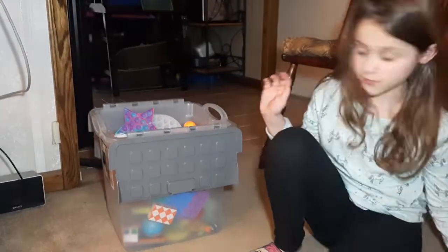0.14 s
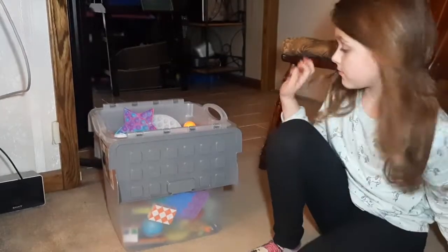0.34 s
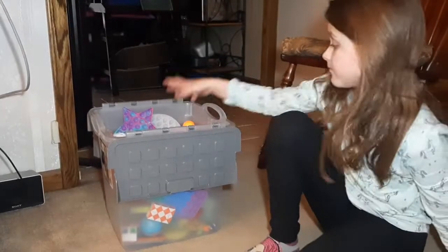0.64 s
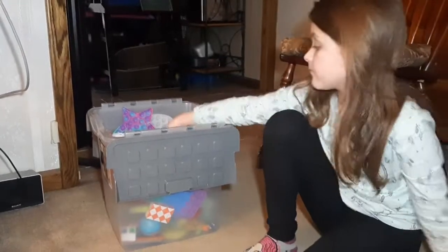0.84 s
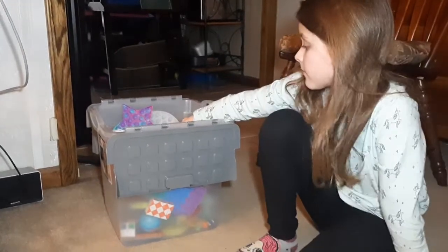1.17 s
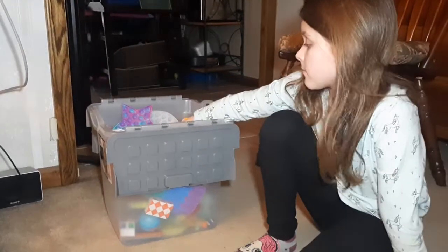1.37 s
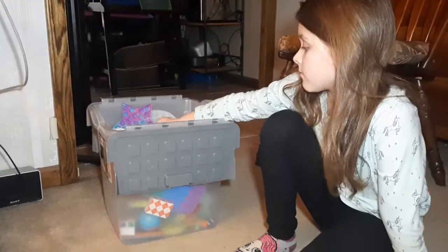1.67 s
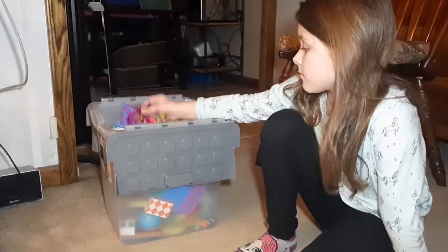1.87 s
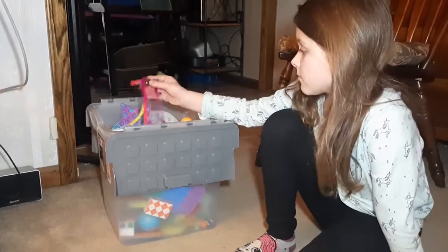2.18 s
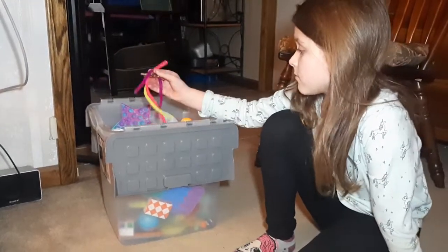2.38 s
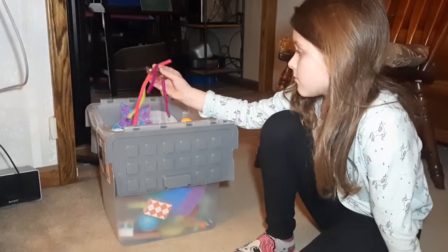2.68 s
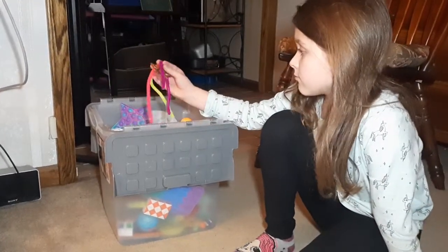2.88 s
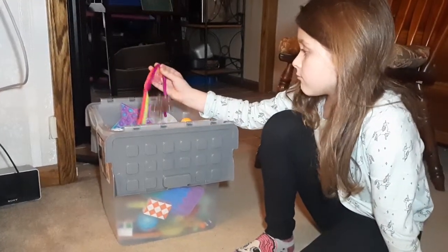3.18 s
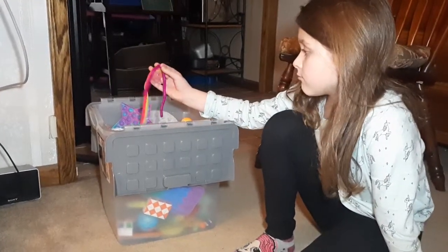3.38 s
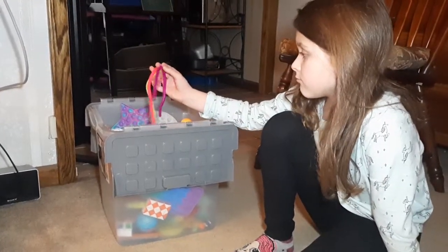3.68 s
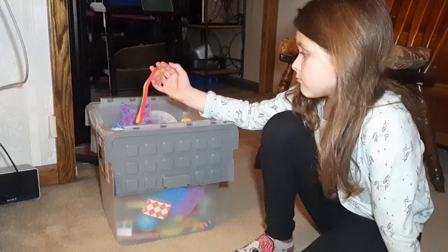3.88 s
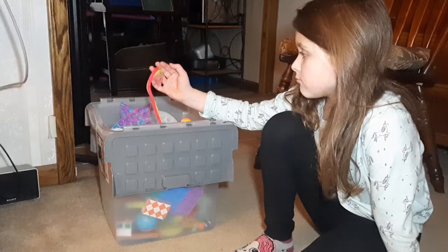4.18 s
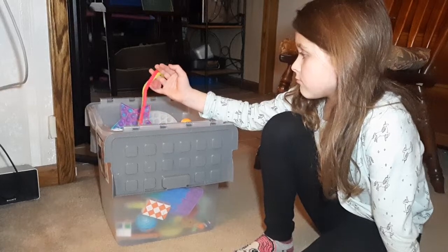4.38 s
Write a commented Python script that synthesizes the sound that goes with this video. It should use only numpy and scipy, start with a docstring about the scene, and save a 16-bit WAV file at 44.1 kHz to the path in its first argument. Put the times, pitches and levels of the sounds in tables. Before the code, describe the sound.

A hand rummages through small plastic toys in a bin, clicking, knocking and rattling, then a bright burst of hard clicks in a quiet room.

```python
"""A hand rummages in a plastic bin of small toys in a quiet carpeted room, a metre from a nearly mono microphone.
A sharp click and knock open over hum, rumble, a thin tone, ventilation and hiss; cloth slides from 0.47 to 1.1 s.
Clicks, knocks and booms (chatter ringing damped modes) crowd 0.75-2.5 s, with rattle and scrape from random grains.
After a lull a burst of hard clicks comes at 3.3-3.5 s, the loudest since the opening click, then contacts thin out;
a short room tail follows every contact."""
import sys
import numpy as np
from scipy import signal
from scipy.fft import rfft, irfft
from scipy.io import wavfile
from scipy.ndimage import uniform_filter1d

SR = 44100
rng = np.random.default_rng(int(sys.argv[2]) if len(sys.argv) > 2 else 0)


def magnitude_from_level(level_db):
    """Linear magnitude for a level in decibels (20 dB per decade)."""
    exponent = np.asarray(level_db, float) / 20
    return 10 ** exponent


def unload_audio(sound):
    """Save the sound as a 16-bit wav file, at the path given as the first command line argument."""
    columns = np.transpose(np.atleast_2d(sound))
    # keep every value between -1 and 1, then stretch to whole-number steps
    steps = np.round(np.clip(columns, -1, 1) * 32767)
    wavfile.write(sys.argv[1], SR, steps.astype(np.int16))


N = 199806


def level(x, db):
    """Scale to an rms level."""
    return x * magnitude_from_level(db) / np.sqrt(np.mean(x ** 2))


def curve(table):
    """Columns of a time table, interpolated to one value a sample."""
    s, *columns = np.transpose(table)
    return [np.interp(np.arange(N) / SR, s, c) for c in columns]


def colour(x, shape):
    """Filter a noisy signal by a (Hz, dB) response, linear in dB over log frequency."""
    hz, db = np.transpose(shape)
    bins_hz = np.arange(len(x) // 2 + 1) * SR / len(x) + 1  # +1 keeps the log finite
    gain_db = np.interp(np.log(bins_hz), np.log(hz), db)
    return irfft(rfft(x) * magnitude_from_level(gain_db), len(x))


def narrow(hz, width_hz):
    """Noise in one resonance: the narrower, the slower its level wavers."""
    b, a = signal.iirpeak(hz, hz / width_hz, fs=SR)
    return signal.lfilter(b, a, rng.standard_normal(N))


def flurries(rate_hz, depth_db):
    """Gain that takes random dB values at rate_hz and glides between them."""
    hold = int(SR / rate_hz)
    steps = np.repeat(rng.standard_normal(N // hold + 1), hold)
    return magnitude_from_level(depth_db * uniform_filter1d(steps, hold)[:N])


def grains(rate_hz, scatter_db):
    """Tiny contacts at random times, some louder than the rest."""
    loudness_db = scatter_db * np.minimum(rng.exponential(size=N), 4)
    size = magnitude_from_level(loudness_db) * rng.choice([-1, 1], N)
    return size * (rng.random(N) < rate_hz / SR)


def blows(table, modes, chatter_ms, first_db):
    """Each blow is a brief chatter of contacts that rings the damped modes near its centre pitch."""
    rise_ms = 1.3  # time constant
    out, t = np.zeros(N + 8192), np.arange(4096) / SR
    hz, db, t60 = np.transpose(modes)[:, :, None]
    for s, blow_db, centre_hz, spread_oct in table:
        # where the blow lands sets how hard each mode moves; neighbours swing in opposite sense
        place = magnitude_from_level(1.5 * rng.standard_normal(hz.shape)) * (-1) ** np.arange(len(hz))[:, None]
        near = np.exp(-.5 * (np.log2(hz / centre_hz) / max(spread_oct, .1)) ** 2)
        detune = 1 + .03 * rng.standard_normal(hz.shape)  # no two pieces are quite the same size
        decay = np.exp(-np.log(1000) * t / t60)
        ring = (magnitude_from_level(db) * near * place * np.sin(2 * np.pi * hz * detune * t) * decay).sum(0)
        # some blows chatter longer
        lasts_ms = max(chatter_ms, .2) * np.exp(.25 * rng.standard_normal())
        contacts = rng.standard_normal(len(t)) * np.exp(-1000 * t / lasts_ms)
        contacts *= 1 - np.exp(-1000 * t / rise_ms)  # the pieces meet edge first, then fully
        # one firm contact, relative to the whole chatter
        contacts[int(rise_ms * SR / 1000)] += magnitude_from_level(first_db) * np.sqrt(np.sum(contacts ** 2))
        hit = signal.fftconvolve(contacts, ring)
        i = int(max(s, 0) * SR)
        # first 9 ms set to an rms of blow_db less 9.5 dB: chance changes the grain, not the loudness
        out[i:i + len(hit)] += magnitude_from_level(blow_db) * hit / np.sqrt(np.mean(hit[:400] ** 2)) / 3
    return out[:N]


def clicks():
    """Hard plastic parts click: small and heavily damped, they ring for a few ms."""
    # clicks: (time [s], level [dB], centre [Hz], spread [octaves])
    click_times = [(0.0004, -17.5, 5030, 1.3), (0.0251, -56, 2780, 1.4), (0.0782, -47, 6000, 1),
                   (0.17, -54.5, 5940, 0.82), (0.4075, -55.5, 6700, 0.25), (0.4294, -49, 4500, 0.64),
                   (0.4653, -60, 2700, 0.4), (0.7522, -47.5, 2540, 1.8), (0.826, -46.5, 3000, 1.8),
                   (0.836, -39.5, 2500, 1.9), (0.8794, -46.5, 2760, 1.7), (0.9627, -41, 3000, 1.08),
                   (1.04, -39, 2620, 1.7), (1.1438, -38.5, 3350, 0.68), (1.1594, -42, 4800, 1.16),
                   (1.2058, -48, 3420, 1.2), (1.2845, -55.5, 9000, 0.61), (1.4295, -48.5, 4900, 1.9),
                   (1.443, -51, 8000, 0.88), (1.4842, -42, 4460, 1.1), (1.4964, -44.5, 4200, 1.8),
                   (1.518, -42.5, 9040, 1.4), (1.5374, -38.5, 3580, 1.5), (1.5584, -36.5, 9600, 0.8),
                   (1.5974, -49, 7400, 1.6), (1.6686, -54.5, 2450, 1.2), (1.8093, -63.5, 3920, 0.35),
                   (1.8412, -48, 5900, 0.7), (1.8796, -41.5, 4300, 0.63), (1.8966, -39, 3780, 0.52),
                   (1.917, -45.5, 4800, 1.7), (1.9445, -41.5, 3500, 0.46), (1.9589, -41, 3130, 0.45),
                   (2.0318, -41, 3200, 0.93), (2.061, -39, 3600, 1), (2.0692, -35.5, 3980, 1.15),
                   (2.0874, -41, 3980, 0.21), (2.1311, -42, 2930, 0.73), (2.2049, -45.5, 4450, 0.8),
                   (2.2543, -55.5, 3800, 0.54), (2.2897, -55, 3870, 0.41), (2.4414, -49, 5800, 0.61),
                   (2.591, -63, 2900, 1.6), (3.1363, -64, 7000, 0.74), (3.2864, -39.5, 9620, 0.58),
                   (3.2954, -33, 9700, 1.4), (3.3174, -37.5, 9210, 1.8), (3.3583, -25.5, 2840, 1.9),
                   (3.3684, -27, 8200, 0.43), (3.3844, -28, 4630, 0.77), (3.4176, -28.5, 5470, 0.51),
                   (3.4567, -39.5, 5500, 0.88), (3.478, -31.5, 9230, 1.72), (3.5065, -44.5, 3280, 1.3),
                   (3.5294, -43.5, 5100, 1.15), (3.5508, -45, 9700, 0.53), (3.5974, -54.5, 8660, 1.6),
                   (3.6676, -49, 6510, 1.4), (3.8636, -58.5, 6900, 0.42), (3.9524, -55.5, 6500, 0.59),
                   (3.975, -60, 4470, 1.1), (4.0494, -62, 5220, 1.3)]
    # modes of the small parts: (frequency [Hz], level [dB], t60 [s])
    part_modes = [(1519, 0.5, 0.0054), (2060, -0.5, 0.004), (2507, 0, 0.0048), (2990, 1, 0.0055),
                  (3520, 4.5, 0.0021), (4053, 1, 0.0045), (4800, -0.5, 0.0042), (5833, -2.5, 0.0051),
                  (6540, -1.5, 0.0036), (6636, 1, 0.0049), (7430, 1.5, 0.0025), (8470, 2, .003),
                  (9530, 4, 0.0019), (10845, -1, 0.0029), (11330, -2, 0.0024), (13500, -8.5, 0.0033),
                  (15000, -10.5, 0.0018)]
    return blows(click_times, part_modes, chatter_ms=3.8, first_db=-5.0)


def knocks():
    """A dull knock rings the modes of the bin wall it hits."""
    # knocks on the walls: (time [s], level [dB], centre [Hz], spread [octaves])
    knock_times = [(0.0, -33.5, 2220, 0.94), (0.002, -40.5, 490, 0.41), (0.085, -46, 1390, 0.54),
                   (0.17, -48.5, 1360, 0.63), (0.339, -55.5, 1360, 0.65), (0.408, -50, 2020, 0.59),
                   (0.428, -48, 1385, 0.56), (0.752, -44.5, 1560, 0.4), (0.841, -30, 1000, 0.68),
                   (0.885, -44, 546, 0.55), (0.949, -42, 1110, 0.38), (1.05, -32, 1070, 0.51),
                   (1.147, -38.5, 525, 1.1), (1.174, -41.5, 596, 1.1), (1.198, -39, 990, 0.56),
                   (1.32, -38, 480, 0.77), (1.416, -48, 1710, 0.18), (1.424, -42, 496, 0.59),
                   (1.474, -39, 600, 0.61), (1.481, -30.5, 600, 0.79), (1.494, -32, 530, 0.9),
                   (1.53, -35, 520, 0.76), (1.559, -43, 490, 1.1), (1.841, -37, 627, 0.34),
                   (1.944, -42.5, 1920, 0.94), (1.996, -41, 520, 1.1), (2.069, -46, 483, 0.82),
                   (2.128, -49, 590, 0.24), (2.192, -51.5, 1900, 0.15), (2.271, -49.5, 450, 1.1),
                   (2.44, -43, 596, 0.49), (2.452, -47, 479, 0.5), (2.591, -61.5, 2100, 0.28),
                   (3.295, -45, 500, 0.97), (3.358, -57.5, 1290, 0.6), (3.477, -49.5, 1940, 0.5),
                   (3.952, -40.5, 860, 0.26)]
    # modes of the bin walls: (frequency [Hz], level [dB], t60 [s])
    wall_modes = [(342, 2, 0.015), (462.6, -1.5, 0.065), (650, 1.5, 0.018), (823, -1, 0.034),
                  (912, 7, 0.0081), (1168, -7, 0.048), (1290, 0, 0.016), (1463, -0.5, 0.027),
                  (1805, -6.5, 0.036), (2169, 0, 0.016), (2744, -0.5, 0.014)]
    return blows(knock_times, wall_modes, chatter_ms=3.49, first_db=6.5)


def thuds():
    """A bump shakes the whole bin, which booms in its lowest modes."""
    # bumps: (time [s], level [dB])
    bumps = [(0.0, -48.5), (0.825, -41.5), (0.856, -46), (1.05, -44.5), (1.147, -44.5), (1.174, -45.5),
             (1.34, -47), (1.439, -42), (1.494, -39), (1.529, -52), (1.559, -43), (1.841, -50.5),
             (1.944, -46.5), (1.997, -47.5), (2.271, -52.5), (2.439, -51.5), (3.295, -42.5), (3.36, -49),
             (3.421, -52), (3.475, -55.5), (3.696, -58), (3.952, -44.5), (4.199, -52.5)]
    # modes of the whole bin: (frequency [Hz], level [dB], t60 [s])
    boom_modes = [(126, -2, 0.043), (190.4, -3.5, 0.083), (248.3, 1.5, 0.057), (310, 1.5, 0.032)]
    centre_hz, spread_oct = 194, 1
    table = [(s, db, centre_hz, spread_oct) for s, db in bumps]
    return blows(table, boom_modes, chatter_ms=8.1, first_db=4.5)


def rummage():
    """Loose pieces rattle in flurries, each size in its own pitch range, and scrape the bin."""
    # pieces shifting under the hand: (time [s], rattle level [dB], scrape level [dB])
    motion = [(0.0, -76, -63), (0.146, -72, -78.5), (0.504, -83, -75.5), (0.8, -83, -71.5),
              (0.848, -64, -60), (1.068, -64, -60), (1.226, -71, -66.5), (1.492, -71.5, -67),
              (1.664, -82, -64.5), (1.79, -83.5, -76.5), (1.894, -57.5, -62), (2.03, -63.5, -60),
              (2.128, -71, -70), (2.27, -71.5, -68.5), (2.42, -88.5, -78.5), (2.46, -74.5, -67),
              (2.7, -90, -78.5), (3.27, -87.5, -82.5), (3.3, -76.5, -59), (3.462, -63.5, -63),
              (3.56, -81.5, -73.5), (3.7, -80, -79), (3.94, -88, -80), (3.98, -78.5, -71),
              (4.15, -88, -73.5), (4.53, -93.5, -85)]
    # rattle response: (frequency [Hz], level [dB])
    rattle_shape = [(590, -39.5), (1000, 1), (1480, -9.5), (1840, -4.5), (2130, -7), (4050, -5),
                    (7030, 0.5), (9250, -8), (15500, -26.5)]
    # scrape response: (frequency [Hz], level [dB])
    scrape_shape = [(59, -30), (100, -2), (364, 0), (497, 2), (935, -6.5), (1130, -8), (2020, -22.5),
                    (2500, -24.5), (3250, -54), (5500, -120)]
    rattle_db, scrape_db = curve(motion)
    shake, pieces = flurries(30., 3.9), 0
    for hz in 1200 * 1.6 ** np.arange(6):
        b, a = signal.butter(1, [hz / 1.3, hz * 1.3], "band", fs=SR)
        piece = signal.lfilter(b, a, grains(1403.0, 2.9))
        pieces = pieces + flurries(23.0, 3.5) * piece / np.sqrt(hz)
    rattle = level(colour(shake * pieces, rattle_shape), 0)
    scrape = level(colour(grains(800., 3.3), scrape_shape), 0)
    return magnitude_from_level(rattle_db) * rattle + magnitude_from_level(scrape_db) * scrape


def room(x):
    """Add a diffuse tail whose treble dies first."""
    # decay by band: (centre [Hz], t60 [s])
    decays = [(250, 0.32), (1400, 0.29), (4000, 0.22), (10000, 0.057)]
    tail_db, onset_s = -5, 0.0085
    t = np.arange(SR // 2) / SR
    tail = 0
    for hz, t60 in decays:
        band = signal.butter(2, [hz / 2.2, min(hz * 1.8, 20000)], "band", fs=SR, output="sos")
        noise = signal.sosfilt(band, rng.standard_normal(len(t)))
        tail = tail + noise * np.exp(-np.log(1000) * t / t60) / np.sqrt(t60)
    tail = tail * np.clip(t / onset_s, 0, 1)  # reflections build up over a few ms
    gain = magnitude_from_level(tail_db) / np.sqrt(np.sum(tail ** 2))
    return x + gain * signal.fftconvolve(x, tail)[:N]


def hum():
    """A low hum of drifting pitch that wavers at random and swells now and then."""
    # swells: (time [s], level [dB], Gaussian sigma [s])
    hum_swells = [(0.0, -63, 0.087), (0.66, -70, 0.062), (0.88, -63, 0.036), (1.41, -71, 0.065),
                  (1.64, -51.5, 0.048), (2.01, -67.5, 0.056), (2.64, -61.5, 0.028), (3.63, -63, 0.06),
                  (4.26, -61, 0.02)]
    centre_hz, drift_rms_hz = 57., 4.
    base_db, waver_db = -71, 4
    t = np.arange(N) / SR
    drift = uniform_filter1d(uniform_filter1d(rng.standard_normal(N), size=2000), size=2000)
    phase = 2 * np.pi * np.cumsum(centre_hz + drift_rms_hz * level(drift, 0)) / SR
    swells = sum(magnitude_from_level(db) * np.exp(-.5 * ((t - s) / sigma_s) ** 2) for s, db, sigma_s in hum_swells)
    return (magnitude_from_level(base_db) * flurries(14.0, waver_db) + swells) * level(np.sin(phase), 0)


def rumble():
    """Broad low resonance of noise, with its upper side rolled off."""
    centre_hz, width_hz, rms_db = 34.1, 68, -70.5
    return level(colour(narrow(centre_hz, width_hz), [(60, -2.5), (120, -16)]), rms_db)


def thin_tone():
    """A steady sine plus narrow noise at the same pitch, so its level wavers a little."""
    hz, width_hz, rms_db = 430., 8., -74
    steady = np.sin(2 * np.pi * hz * np.arange(N) / SR)
    return level(steady + level(narrow(hz, width_hz), -5.5), rms_db)


def ventilation():
    """Steady air noise: white noise through a fixed response."""
    # air response: (frequency [Hz], level [dB])
    air_shape = [(53, -20.5), (90, 2), (196, -20), (270, -24.5), (370, -35), (480, -5), (786, -3.5),
                 (1200, -15), (1870, -35), (3500, -28), (13500, -20), (16000, -22.5)]
    return level(colour(rng.standard_normal(N), air_shape), -71)


def preamp_hiss():
    """White noise through a fixed response, for the preamp."""
    # hiss response: (frequency [Hz], level [dB])
    hiss_shape = [(59, -33), (100, -7.5), (595, -9.5), (3780, -18), (6420, -2.5), (16000, -3)]
    return level(colour(rng.standard_normal(N), hiss_shape), -81.5)


def swish():
    """Cloth sliding, a band of noise heard only while the arm reaches out."""
    start_s, end_s, ramp_s = 0.47, 1, 0.12
    centre_hz, width_hz, rms_db = 1700., 500., -75
    times = [start_s, start_s + ramp_s, end_s, end_s + ramp_s]
    gain = np.interp(np.arange(N) / SR, times, [0, 1, 1, 0])
    return gain * level(narrow(centre_hz, width_hz), rms_db)


def scene():
    """Toys in the room over the background, alike in both channels."""
    toys = clicks() + knocks() + thuds() + rummage() + swish()
    background = hum() + rumble() + thin_tone() + ventilation()
    mid = room(toys) + background
    return np.array([mid, mid])


def top_cut(x):
    """Nothing passes above 16.5 kHz."""
    return signal.sosfilt(signal.butter(12, 16500, fs=SR, output="sos"), x)


def record(dry):
    """Preamp hiss enters the channels in opposite sense; a steep low-pass cuts the top."""
    top_hz = 15800
    noisy = dry + preamp_hiss() * np.array([[1], [-1]])
    low_pass = signal.ellip(8, .2, 60, top_hz, fs=SR, output="sos")
    mix = signal.sosfilt(low_pass, noisy)
    return top_cut(mix)


dry = scene()
out = record(dry)
unload_audio(out)
```